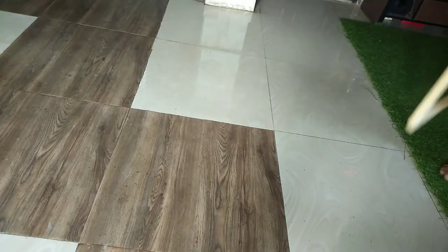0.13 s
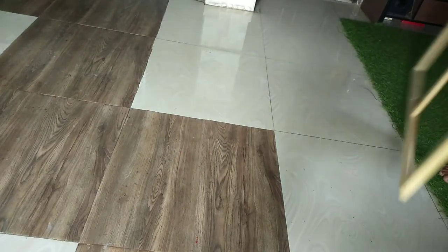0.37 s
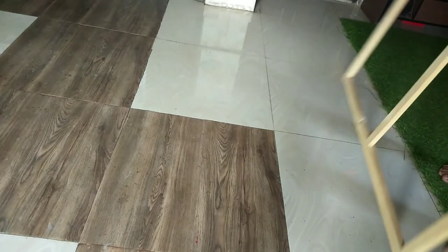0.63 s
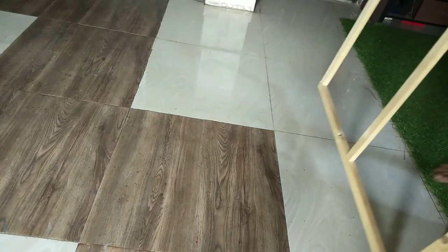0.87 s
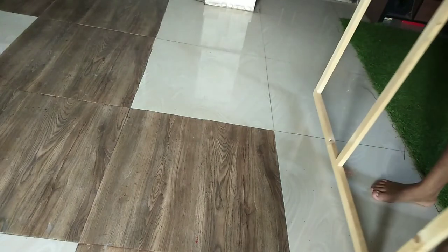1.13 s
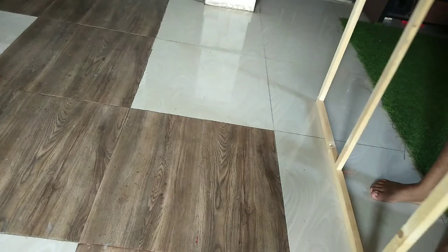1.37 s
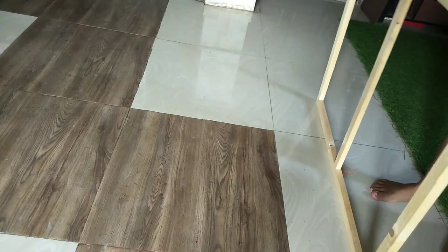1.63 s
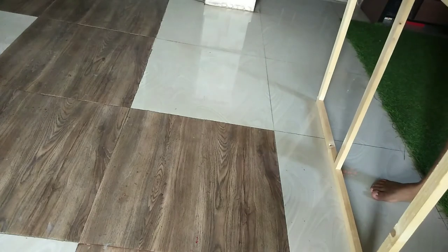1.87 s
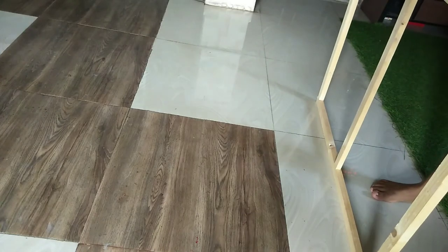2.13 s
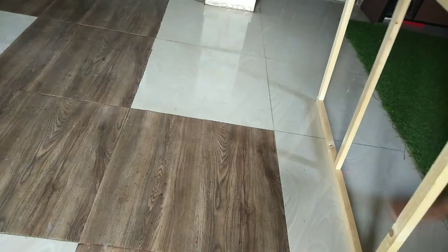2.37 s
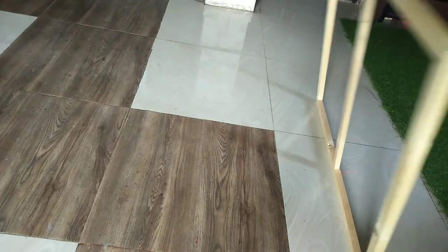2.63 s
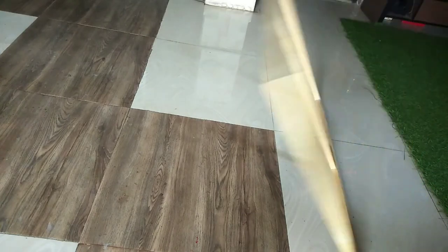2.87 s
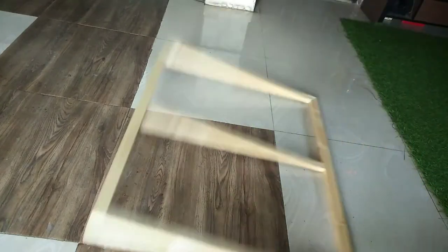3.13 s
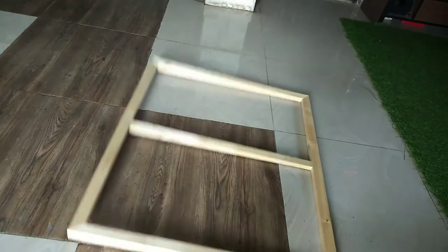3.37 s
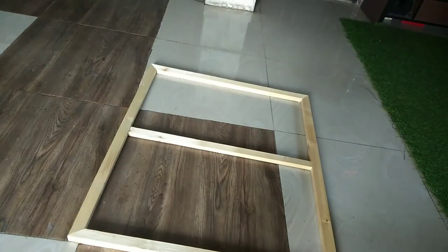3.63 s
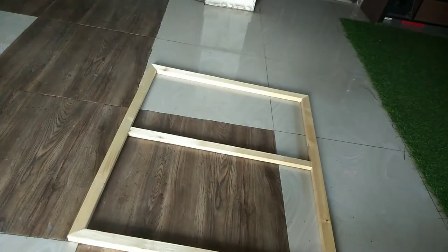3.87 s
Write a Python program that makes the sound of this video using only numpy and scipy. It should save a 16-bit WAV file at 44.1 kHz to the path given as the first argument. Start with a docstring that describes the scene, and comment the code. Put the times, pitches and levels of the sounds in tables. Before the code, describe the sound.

Quiet room air, a soft wooden tap, a pause, then a very loud double clack of a wooden frame on tile with brief rattling and a short bright reverb; the phone microphone slightly saturates.

```python
"""A bare room with a tiled floor: a light wooden frame is set on its edge, tips over, slaps down flat,
bounces once and rattles to rest. Each blow is a filtered click with ringing bars and a low thud;
the rattle is runs of small random clacks. Sparse decaying taps make the room ring after every clack.
Shaped noise gives air and rumble; gliding noise bands, narrow for faint drones and bird whistles, broad for
airy rustles, sound from afar. A phone microphone limits the slap."""
import sys
import numpy as np
from scipy import signal
from scipy.io import wavfile
from scipy.ndimage import uniform_filter1d

SR = 44100
rng = np.random.default_rng(int(sys.argv[2]) if len(sys.argv) > 2 else 0)


def magnitude_from_level(level_db):
    """Linear magnitude for a level in decibels (20 dB per decade)."""
    exponent = np.asarray(level_db, float) / 20
    return 10 ** exponent


def digitize_waveform(pressure):
    """Quantize a signal to 16-bit integers and store it at the path in sys.argv[1].

    Rows of a 2-D input are taken as channels; values are limited to [-1, 1].
    """
    field = np.atleast_2d(pressure).T
    bounded = np.clip(field, -1, 1)
    quanta = np.round(bounded * 32767).astype(np.int16)
    wavfile.write(sys.argv[1], SR, quanta)


N = 176400  # 4 s


def evened(x):
    """Scales a sound to an rms of 1."""
    return x / np.sqrt(np.mean(x ** 2) + 1e-20)


def read(points, hz):
    """Reads a spectral table at hz, interpolating along log frequency."""
    f, value = np.transpose(points)
    return np.interp(np.log(hz + 1), np.log(f + 1), value)


def along(rows, t):
    """Reads a level curve at the times t."""
    s, value = np.transpose(rows)
    return np.interp(t, s, value)


def add(mix, s, sound):
    """Adds a sound into the mix from s seconds on, cut at the end of the mix."""
    part = mix[round(s * SR):][:len(sound)]
    part += sound[:len(part)]


def rings(modes, bright_db=0):
    """Struck modes as dying sines; a soft blow (negative dB per octave) favours the low ones."""
    t = np.arange(SR // 4) / SR
    out = np.zeros(len(t))
    for hz, db, t60 in modes:
        level_db = db + bright_db * np.log2(hz / 2000)
        out += magnitude_from_level(level_db - 60 * t / t60) * np.sin(2 * np.pi * hz * t)
    return out


def clack(bright_db, ring_db):
    """Wood on tile: a causal (minimum-phase) click of peak 1, with the bars ringing briefly after it."""
    # colour of the click: (frequency [Hz], density [dB per Hz])
    colour = [(50, -88.5), (150, -30), (300, -25), (500, -18), (800, -15.5), (1200, -9), (1800, -4),
              (2800, -3.5), (3800, 0), (4800, -6), (6500, -20.5), (10000, -35), (16000, -34.5)]
    # modes of the wooden bars: (frequency [Hz], level [dB], t60 [s])
    bars = [(800, -18, 0.09), (1120, -21.5, 0.12), (1490, -11, 0.022), (2110, -10, 0.022),
            (2925, 0.5, 0.013), (3100, 0.5, 0.035), (3680, -13.5, 0.015), (4430, -11, .015)]
    ring_tilt = 0.4  # share of the brightness that reaches the bars
    hz = np.abs(np.fft.fftfreq(4096, 1 / SR))
    tilt_db = bright_db * np.log2((hz + 100) / 3000)
    log_gain = np.log(magnitude_from_level(np.maximum(read(colour, hz) + tilt_db, -90)))
    phase = -signal.hilbert(log_gain).imag
    click = np.fft.ifft(np.exp(log_gain + 1j * phase)).real[:2048]
    out = magnitude_from_level(ring_db) * rings(bars, ring_tilt * bright_db)
    add(out, 0, click / np.abs(click).max())
    return out


def landing():
    """A bar lands over a short stretch, not at one point: a first touch and a brief rough roll."""
    contact_s, contact_share = 0.00093, 0.67
    t = np.arange(300) / SR
    roughness = rng.standard_normal(300) * (rng.random(300) < 0.15)  # sparse random touches
    return np.r_[1, contact_share * roughness * np.exp(-t / contact_s)]


def blows():
    """Corners and bars meeting the tiles: single clacks spread by the contact, each with its thud."""
    # (time [s], level [dB], brightness [dB per octave], ring under the clack [dB], thud under the clack [dB])
    hits = [(1.4423, -33, -6.5, -29, -38), (1.4426, -28, -9, -28, -32), (3.2554, -2, -0.8, -7, -7),
            (3.4873, -17, -0.5, -10.5, -40), (3.4922, -1, 0, -52, -43), (3.4962, -15.5, -3, -13.5, -49),
            (3.5007, -16, -1, -15, -35), (3.5106, -12, 0, -17, -47), (3.5237, -9, -1, -19.5, -40),
            (3.531, -20.5, 3, -21, -44), (3.862, -35, -11.5, -37, -52), (3.874, -36, -12, -18, -50)]
    # modes of the frame and its air cushion: (frequency [Hz], level [dB], t60 [s])
    thud = [(63.3, -12.5, 0.21), (99.2, -3.5, 0.042), (135.5, -4, 0.043), (231, -1.5, 0.024),
            (308, -5, 0.022)]
    out = np.zeros(N)
    for s, db, bright_db, ring_db, thud_db in hits:
        spread_clack = signal.fftconvolve(clack(bright_db, ring_db), landing())
        add(out, s, magnitude_from_level(db) * spread_clack)
        add(out, s, magnitude_from_level(db + thud_db) * rings(thud))
    return out


def chatter():
    """Bars chattering on the tiles: runs of quick small clacks at random moments and sizes."""
    # (start [s], length [s], level at start [dB], level at end [dB], brightness [dB per octave])
    runs = [(1.35, 0.11, -63, -61.5, -11), (1.439, 0.015, -43.5, -44.5, -2.5), (1.455, .1, -47, -61.5, -12),
            (2.855, 0.19, -69.5, -75, -14.5), (3.256, .024, -0.5, -5, 1.7),
            (3.493, 0.074, -29.5, -33.5, -3.5), (3.544, 0.18, -31, -37.5, -6)]
    taps_per_s, ring_db = 1500, -32.5
    spread_db, size_floor = 3.5, 0.06  # the floor limits the biggest taps
    out = np.zeros(N)
    for s, length, first_db, last_db, bright_db in runs:
        count = round(length * SR)
        chance, sign, size = rng.random((3, count))
        heights = np.sign(sign - 0.5) * magnitude_from_level(-spread_db * np.log(size + size_floor))
        taps = (chance < taps_per_s / SR) * heights
        taps = taps * magnitude_from_level(np.linspace(first_db, last_db, count))
        add(out, s, signal.fftconvolve(taps, clack(bright_db, ring_db)))
    return out


def room(x):
    """Sparse taps of random sign, each band dying at its own speed; three such tails cross-fade in turn."""
    # decay of the bare room: (frequency [Hz], t60 [s])
    decay = [(100, 0.13), (200, 0.13), (400, .36), (1000, 0.42), (3000, 0.34), (7000, 0.34), (14000, 0.34)]
    level_db, low_cut_hz = 1.54, 153
    gap_s, turn_s = 0.000984, 0.06  # delay before the tail; time for a full round of turns
    x = signal.sosfilt(signal.butter(2, low_cut_hz, "high", fs=SR, output="sos"), x)
    at = np.arange(0, SR - 12, 12)  # one tap in every 12 samples
    turn = np.pi * np.arange(N) / SR / turn_s
    out = np.zeros(N)
    for k in range(3):
        taps = np.zeros(SR)
        taps[at + rng.integers(0, 12, len(at))] = rng.choice([-1., 1.], len(at))
        hz, t, z = signal.stft(taps, SR, nperseg=256)
        fade = magnitude_from_level(-60 * t / read(decay, hz)[:, None])
        tail = signal.istft(z * fade, SR, nperseg=256)[1]
        tail = np.r_[np.zeros(round(gap_s * SR)), tail / np.linalg.norm(tail)]
        # the room's colour keeps changing; the squared shares always add up to 1
        share = np.sqrt(2 / 3) * np.cos(turn + k * np.pi / 3)
        out += signal.fftconvolve(x * share, tail)[:N]
    return magnitude_from_level(level_db) * out


def resonate(x, hz, width):
    """A resonance of gain 1, width in Hz, that follows the curve hz: shift to zero, smooth, shift back."""
    turn = np.exp(2j * np.pi * np.cumsum(hz * np.ones(len(x))) / SR)
    r = np.exp(-np.pi * width / SR)
    return 2 * (turn * signal.lfilter([1 - r], [1, -r], x / turn)).real


def noise_band(count, hz, width):
    """Noise through two equal resonances in a row, at an rms of 1: the wider, the airier."""
    noise = rng.standard_normal(count)
    return evened(resonate(resonate(noise, hz, width), hz, width))


def far_tones():
    """Far gliding noise bands: narrow for bird whistles and drones, broad and airy for rustles."""
    # all three: (start [s], length [s], first frequency [Hz], last frequency [Hz], level [dB], fuzz [Hz])
    whistles = [(.065, .17, 3350, 1950, -71, 90), (.49, .18, 3400, 1900, -71, 90),
                (1.1, 1.0, 3300, 3350, -76, 200), (2.03, .15, 3400, 3750, -78, 120)]
    rustles = [(.17, 0.041, 5000, 4500, -71, 4000), (.33, 0.091, 3000, 2800, -72, 3000),
               (.66, 0.11, 2920, 2500, -68, 2500)]  # brief airy hisses
    drones = [(.0, .37, 300, 305, -66, 14), (.0, .34, 520, 455, -69, 18), (.38, .08, 600, 625, -71, 25),
              (.6, 2.7, 1110, 1170, -76, 160)]
    bend, fade_s = 1.3, 0.015  # glides hold first, move, then level out
    out = np.zeros(N)
    for s, length, first_hz, last_hz, db, fuzz in whistles + rustles + drones:
        t = np.arange(round(length * SR)) / SR
        glide = np.sin(np.pi / 2 * (t / length) ** bend) ** 2
        hz = first_hz + (last_hz - first_hz) * glide
        fade = np.clip(np.minimum(t, length - t) / fade_s, 0, 1)
        add(out, s, magnitude_from_level(db) * noise_band(len(t), hz, fuzz) * fade)
    return out


def air():
    """Room air and far street: random spectra with drifting patches and a flickering level."""
    # colour of the hush: (frequency [Hz], density [dB per Hz])
    colour = [(15, -51.5), (30, -15), (55, -4.5), (100, -10.5), (160, -15), (212, -7.5), (344, -10.5),
              (545, -12), (887, -14), (1160, -14), (1560, -18.5), (3430, -20.5), (5880, -30), (7920, -46),
              (16000, -43.5)]
    # slow swell of the hush: (time [s], level [dB])
    swell = [(0, -59.5), (.2, -57.5), (.45, -60), (.52, -63.5), (.75, -59), (1.0, -62.5), (1.3, -60),
             (1.9, -59.5), (2.3, -59.5), (2.75, -59), (3.2, -56.5), (4, -56.5)]
    patch_db, flicker_db = 1.5, 0.72  # rms
    frames, hz = N // 256 + 5, np.fft.rfftfreq(1024, 1 / SR)
    a, b, patches = rng.standard_normal((3, len(hz), frames))
    patches = uniform_filter1d(patches, size=30, axis=0)  # across frequency
    patches = evened(uniform_filter1d(patches, size=14, axis=1))  # across time
    flicker = evened(uniform_filter1d(rng.standard_normal(frames), size=6))
    z = (a + 1j * b) * magnitude_from_level(read(colour, hz)[:, None] + patch_db * patches + flicker_db * flicker)
    noise = signal.istft(z, nperseg=1024, noverlap=768)[1][:N]
    return evened(noise) * magnitude_from_level(along(swell, np.arange(N) / SR))


def rumble():
    """Lumpy low room rumble: noise in a broad band around 98 Hz."""
    # (time [s], level [dB])
    swell = [(0, -67), (1.3, -66.5), (1.8, -62), (2.2, -63), (2.6, -65), (2.95, -59), (3.2, -59.5),
             (4, -60)]
    return magnitude_from_level(along(swell, np.arange(N) / SR)) * noise_band(N, hz=98, width=100)


def scene():
    """The frame and the far tones ring in the room over the quiet background."""
    sources = blows() + chatter() + far_tones()
    return (sources + room(sources) + air() + rumble())[None]


def roll_off(x):
    """The treble ends steeply here."""
    return signal.sosfilt(signal.butter(12, 16560, fs=SR, output="sos"), x)


def record(dry):
    """The microphone drops the deep bass, the input saturates on the slap and the top is band-limited."""
    low_cut_hz, edge_hz, ceiling = 55, 15900, 0.72
    thin = signal.sosfilt(signal.butter(3, low_cut_hz, "high", fs=SR, output="sos"), dry)
    held = ceiling * np.tanh(thin / ceiling)
    band_limit = signal.firwin(511, edge_hz, window=("kaiser", 9), fs=SR)
    mix = signal.oaconvolve(held, band_limit[None], "same")
    return roll_off(mix)


dry = scene()
out = record(dry)
digitize_waveform(out)
```